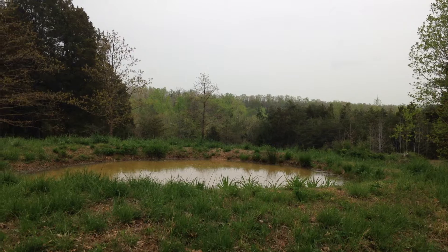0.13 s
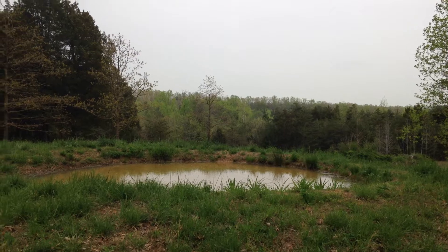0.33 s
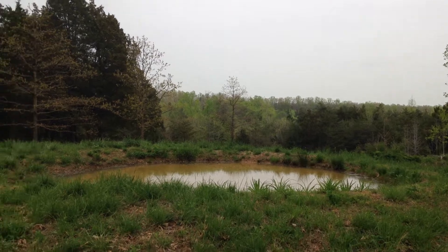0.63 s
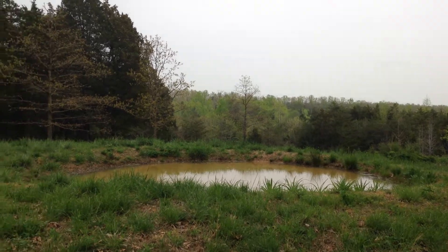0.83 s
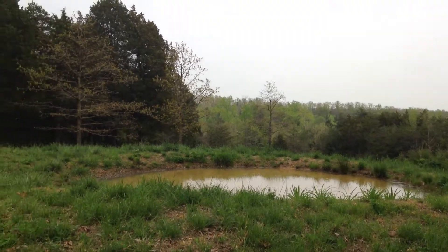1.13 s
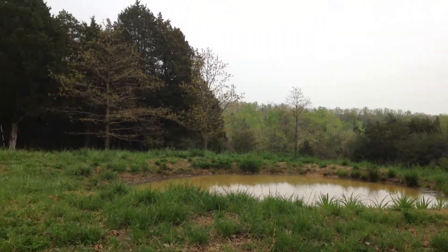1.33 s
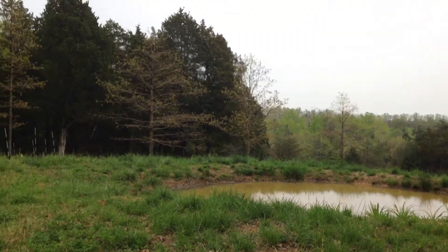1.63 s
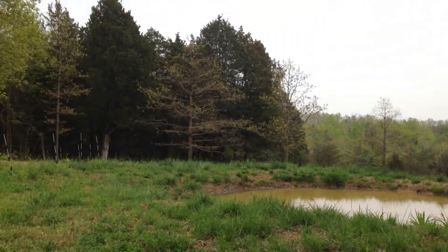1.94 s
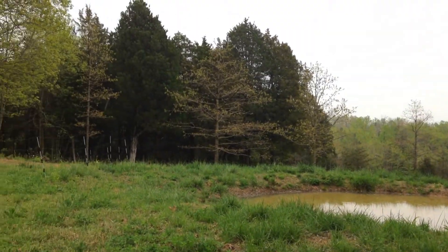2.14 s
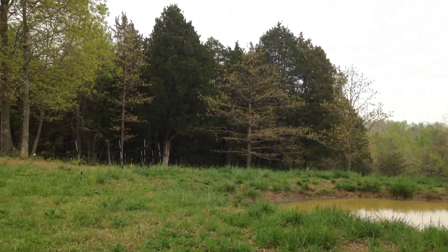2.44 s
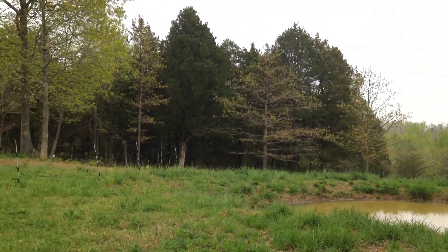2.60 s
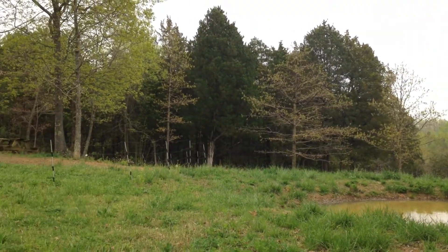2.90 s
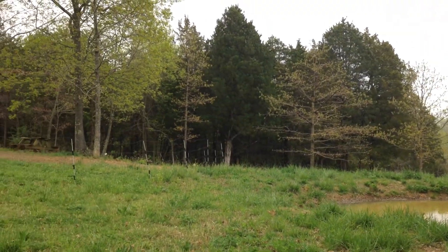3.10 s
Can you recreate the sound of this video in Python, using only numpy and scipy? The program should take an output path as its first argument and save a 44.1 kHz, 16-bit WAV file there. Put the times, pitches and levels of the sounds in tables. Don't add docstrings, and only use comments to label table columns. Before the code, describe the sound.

Overlapping fast toad trills ring continuously across a grassy clearing, over soft leaf hiss and wind rumble

```python
import sys
import numpy as np
from scipy import signal
from scipy.fft import rfft, irfft
from scipy.io import wavfile
from scipy.ndimage import uniform_filter1d

SR = 44100
rng = np.random.default_rng(int(sys.argv[2]) if len(sys.argv) > 2 else 0)


def bounce(signal):
    frames = np.transpose(np.atleast_2d(signal))
    limited = np.clip(frames, -1, 1)
    pcm = np.round(limited * 32767).astype(np.int16)
    wavfile.write(sys.argv[1], SR, pcm)


def gain_from_db(level_db):
    decades = np.asarray(level_db, float) / 20
    return 10 ** decades


N = 143766


def rms_one(x):
    return x / np.sqrt(np.mean(x ** 2) + 1e-20)


def in_time(rows):
    s, value = np.transpose(rows)
    return np.interp(np.arange(N) / SR, s, value)


def drift(rate):
    hop = 40
    r = np.exp(-2 * np.pi * rate * hop / SR)
    slow = signal.lfilter([1], [1, -2 * r, r * r], rng.standard_normal(N // hop + 2002))[2000:]
    return np.interp(np.arange(N) / hop, np.arange(len(slow)), rms_one(slow))


def band_pass(x, order, low, high):
    return signal.sosfilt(signal.butter(order, [low, high], "band", fs=SR, output="sos"), x)


def wavelet(s, db, hz, width, fall=0., rise=1.):
    t = np.arange(N) / SR - s
    bell = np.exp(-(t / np.where(t < 0, rise * width, width)) ** 2)
    glide = 1 - fall * np.clip(t / width, -3, 3) / 2
    return gain_from_db(db) * bell * np.cos(2 * np.pi * hz * t * glide)


def bump(x):
    rise, fall = .17, .24
    return np.exp(-(x / np.where(x < 0, rise, fall)) ** 2) * np.cos(np.pi * np.clip(x, -.5, .5))


def trill(beats, hz, fall, half_db, whole_db):
    # multiple of the main pitch, level/dB
    overtones = [(1.5, -16.5), (2, -26), (2.5, -28.5), (3, -28), (3.5, -23), (4, -43)]
    # t/s, change of the top overtones/dB
    facing = [(.12, -6), (1.1, -4), (1.65, 0), (2.3, -1), (2.6, 2), (3.26, 2)]
    pulse_db, pulse_pitch = 1.0, .006
    overtone_lag, overtone_sharp = .05, 1.9

    k = np.round(beats).astype(int)
    x = beats - k
    draw = rng.standard_normal((200, 3))[k]
    pitch = hz * (1 + pulse_pitch * draw[:, 1] - fall * np.abs(x + 0.14))
    phase = 2 * np.pi * np.cumsum(pitch) / SR + 9 * draw[:, 2]

    top_db = in_time(facing)
    upper = 0
    for m, db in overtones:
        kind_db = half_db if m % 1 else whole_db
        upper = upper + gain_from_db(db + kind_db + top_db * (m > 2)) * np.sin(m * phase)
    pulses = bump(x) * np.sin(phase) + bump(x - overtone_lag) ** overtone_sharp * upper
    return gain_from_db(pulse_db * draw[:, 0]) * pulses


def near_toads():
    # t/s, pace/pulses per s
    near_pace = [(.12, 43.27), (.7, 42.9), (1.3, 42.67), (1.9, 41.96), (2.3, 41.81), (2.7, 40.93),
                 (3.26, 41.8)]
    high_pace = [(.12, 48.94), (.6, 49.28), (1.2, 47.42), (1.8, 49.05)]
    late_pace = [(2.3, 46.59), (2.7, 45.3), (3.26, 44.64)]
    quick_pace = [(.12, 46.77), (1., 42.93), (2., 43.53), (2.6, 43.76), (3.26, 41.86)]
    slow_pace = [(.12, 41.91), (1., 41.23), (2., 40.82), (3.26, 39.6)]
    deep_pace = [(.12, 40.), (2.2, 40.5), (3.26, 41.8)]
    paces = [near_pace, high_pace, late_pace, quick_pace, slow_pace, deep_pace]
    phases = [.39, .66, .08, .82, .48, .3]
    # f/Hz, peak level/dB, half-step overtones/dB, whole overtones/dB, fall in a pulse [0-1]
    singers = [
        (1547, -45, 3, 0.5, .13),
        (1790.5, -41.5, -50, -8, .05),
        (1795, -41.5, -34, -24, .05),
        (1684, -39, -18, -6.5, 0.2),
        (1691, -40, -56, -7.5, 0),
        (1380, -58, -41, 3, 0.02),
    ]
    swell_s, stop_s = .2, .025
    t, out = np.arange(N) / SR, 0
    for pace, phase, (hz, db, half_db, whole_db, fall) in zip(paces, phases, singers):
        start, end = pace[0][0], pace[-1][0]
        beats = phase + np.cumsum(in_time(pace) * (t >= start)) / SR
        already_singing = start < .2
        swell = np.clip((t - start) / swell_s + already_singing, 0, 1)
        swell = swell * np.clip((end - t) / stop_s + 1, 0, 1)
        out = out + gain_from_db(db + drift(0.5)) * swell * trill(beats, hz, fall, half_db, whole_db)
    return out


def far_toads():
    # f/Hz, pace/pulses per s, peak level/dB
    far = [(1556, 44.5, -47.5), (1587, 51., -44), (1744, 41, -46)]
    out = 0
    for hz, rate, db in far:
        beats = rng.random() + np.cumsum(rate + 0.866 * drift(0.518)) / SR
        out = out + gain_from_db(db + 0.83 * drift(1.0)) * trill(beats, hz, 0.044, -30, -9.5)
    return out


def tree_echo(song):
    echo_db, t60_s, cut_hz = -8.5, .3, 2000
    half = SR // 2
    lag = np.arange(half) / SR
    tail = rng.standard_normal(half) * gain_from_db(-60 * lag / t60_s) * (lag > .012)
    tail = tail / np.sqrt(np.sum(tail ** 2))
    echo = signal.fftconvolve(np.r_[song[SR:SR + half], song], tail)[half:half + N]
    return gain_from_db(echo_db) * signal.sosfilt(signal.butter(1, cut_hz, fs=SR, output="sos"), echo)


def toads():
    song = near_toads() + far_toads()
    return song + tree_echo(song)


def banded_noise(spectrum, patchy_db):
    hz, db = np.transpose(spectrum)
    together = drift(4.7)
    white = rng.standard_normal((2, N))
    edges = hz[0] * 2 ** np.arange(0, np.log2(hz[-1] / hz[0]) + 1 / 3, 1 / 3)
    out = 0
    for k, (low, high) in enumerate(zip(edges, edges[1:])):
        band = band_pass(white[k % 2], 2, low, high)
        band_db = np.interp(np.log(low * high) / 2, np.log(hz), db)
        flicker_db = patchy_db * (together + 0.47 * drift(19))
        out = out + band * gain_from_db(band_db + flicker_db)
    return rms_one(out)


def air():
    # f/Hz, level/dB per Hz
    murmur = [(88, -26), (150, -2), (578, -8), (861, -8), (1250, -5), (1620, -2), (2750, -120)]
    return gain_from_db(-63) * banded_noise(murmur, patchy_db=1.0)


def leaves():
    # f/Hz, level/dB per Hz
    hiss = [(2100, 6), (3000, -0.5), (4200, -1), (5600, -5), (7000, -6.5), (10000, -10.5), (15000, -14)]
    return gain_from_db(-70) * banded_noise(hiss, patchy_db=.5)


def wind():
    # t/s, level/dB
    gust = [(.13, -68), (.7, -68), (1., -60), (1.4, -60), (1.72, -68), (1.9, -60), (2.13, -61), (2.24, -70),
            (2.36, -63), (2.55, -57), (2.63, -64), (2.75, -59), (2.82, -70), (2.95, -59), (3.01, -70),
            (3.12, -57), (3.25, -60)]
    # t/s, peak level/dB, f/Hz
    buffets = [(2.433, -50, 90), (0.745, -40.5, 76), (0.773, -46.5, 75), (.962, -50.5, 81),
               (1.005, -51, 53.4), (1.058, -49, 65), (1.111, -56, 81), (1.21, -52, 61.7),
               (1.282, -51, 54.7), (1.346, -50.5, 54), (1.40, -52, 70), (1.467, -42.5, 56),
               (1.54, -47.5, 70), (1.58, -38.5, 81), (1.65, -39.5, 71.4), (1.787, -42.5, 111),
               (1.826, -40, 70), (1.871, -47, 79.4), (1.971, -42, 81), (2.002, -37.5, 93),
               (2.419, -39.5, 85), (2.483, -38.5, 75), (2.56, -39, 114), (2.679, -47, 70), (2.707, -42, 83),
               (2.74, -42.5, 85), (2.768, -47, 79.6), (2.868, -50.5, 66), (3.108, -50, 80), (3.19, -60, 90)]
    # t/s, peak level/dB, width/s
    slaps = [(2.482, -49, 0.0018), (3.067, -42, 0.0029), (3.201, -45.5, 0.0024), (0.962, -46.5, 0.0017),
             (1.296, -53, 0.0015), (1.782, -51, 0.001), (1.813, -44.5, 0.0008), (1.874, -36, 0.0036),
             (1.9971, -31, 0.0012), (2.431, -38.5, 0.0034), (2.56, -35, 0.0024), (1.111, -52, 0.0017)]
    rumble_top_hz, lump_db = 70 * 1.514, 3
    low = band_pass(rng.standard_normal(N + SR), 2, 35, rumble_top_hz)[SR:]
    out = gain_from_db(in_time(gust) + lump_db * drift(13)) * rms_one(low)
    for s, db, hz in buffets:
        out = out + wavelet(s, db, hz, .95 / hz, rise=.7)
    for s, db, width in slaps:
        push = -1 if 1.9 < s < 2.1 else 1
        out = out + push * wavelet(s, db, 101, width)
    return out


def knock():
    start_s, decay_s = .1435, .0003
    t = np.arange(N) / SR - start_s
    return gain_from_db(-41) * (t >= 0) * np.exp(-np.maximum(t, 0) / decay_s)


def bird():
    # t/s, peak level/dB
    chips = [
        (0.2004, -67),
        (0.2249, -68),
        (0.7357, -64),
        (0.8759, -68),
        (0.9448, -64),
        (1.0344, -65),
        (1.5744, -72),
        (2.195, -63),
        (2.8944, -64),
        (2.9233, -65),
    ]
    chip_hz, chip_s, chip_fall = 4680, .0035, .015
    return sum(wavelet(s + chip_s, db - 1.5, chip_hz, chip_s, chip_fall) for s, db in chips)


def ticks():
    # t/s, snap level/dB, body level relative to the snap/dB
    clicks = [
        (0.5467, -64, -6),
        (0.7923, -67, 19.5),
        (0.896, -59, -13),
        (1.72, -59.5, -3),
        (2.144, -64, -6),
        (2.4229, -63, -10),
        (2.4683, -66, -4),
        (2.754, -67, 6),
        (3.2171, -72, -3),
    ]
    decay_s = .0008
    t, white, out = np.arange(N) / SR, rng.standard_normal(N), 0
    bright = rms_one(band_pass(white, 2, 5500, 14000))
    body = rms_one(band_pass(white, 1, 500, 4500))
    for s, db, rel_db in clicks:
        fade = (t >= s) * np.exp(-np.maximum(t - s, 0) / decay_s)
        out = out + gain_from_db(db) * (fade * bright + gain_from_db(rel_db) * fade ** 0.97 * body)
    return out


def scene():
    around = toads() + air() + leaves() + wind() + knock() + bird() + ticks()
    return around[None]


def roll_off(x):
    return signal.sosfilt(signal.butter(12, 15250, fs=SR, output="sos"), x)


def record(dry):
    start_s, rumble_cut_hz, top_hz = .1195, 40, 15300
    notch_hz, notch_width_hz, notch_share = 2015, 110, .55
    x = signal.sosfilt(signal.butter(2, rumble_cut_hz, "high", fs=SR, output="sos"), dry)
    hz = np.fft.rfftfreq(N, 1 / SR)
    x = irfft(rfft(x) * (hz < top_hz), N)
    band = irfft(rfft(x) * np.exp(-(2 * (hz - notch_hz) / notch_width_hz) ** 6), N)
    dropped = uniform_filter1d(1. * (drift(5) > 1 - 3 * notch_share), size=1000)
    opened = np.arange(N) / SR >= start_s
    return roll_off((x - dropped * band) * opened)


dry = scene()
out = record(dry)
bounce(out)
```